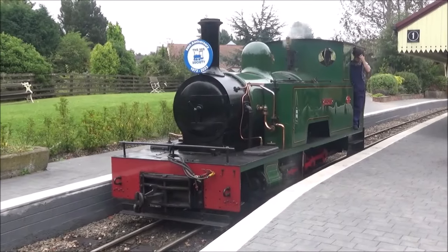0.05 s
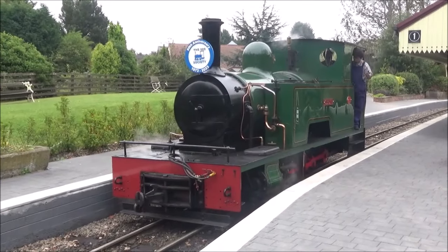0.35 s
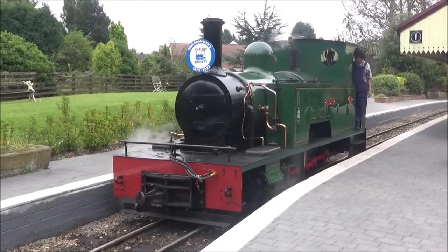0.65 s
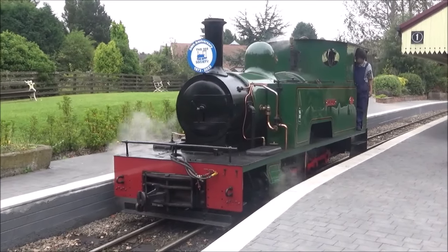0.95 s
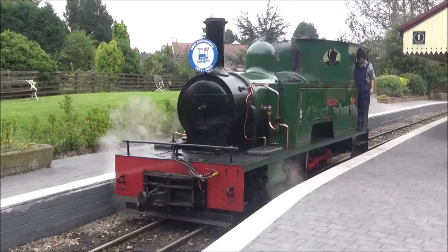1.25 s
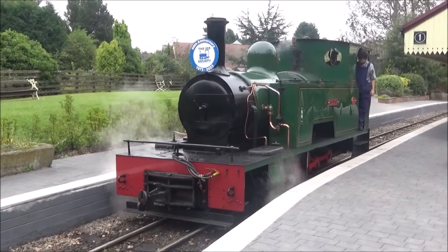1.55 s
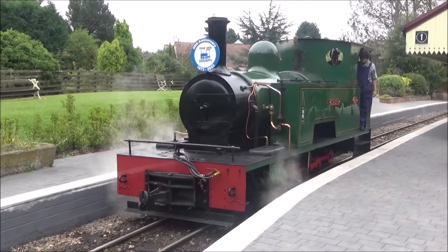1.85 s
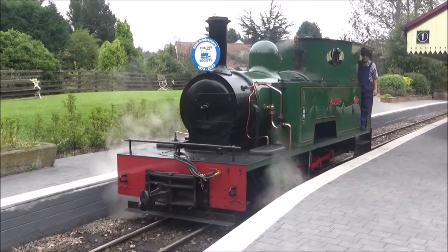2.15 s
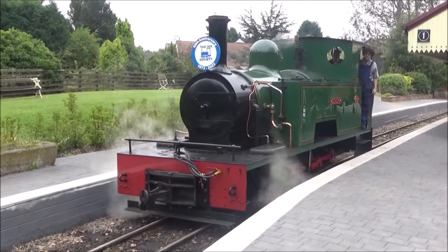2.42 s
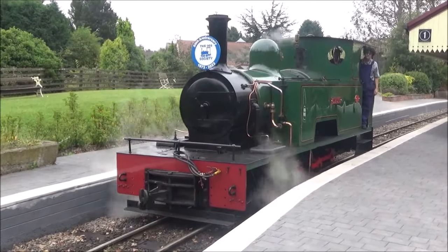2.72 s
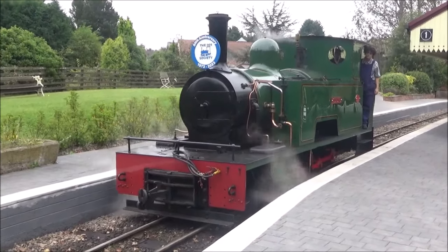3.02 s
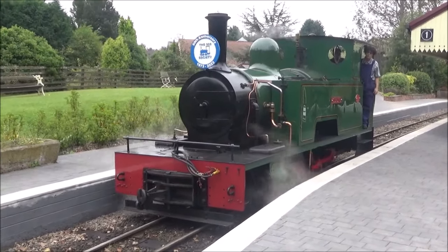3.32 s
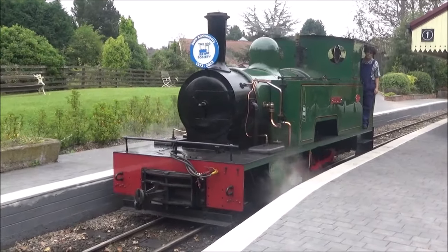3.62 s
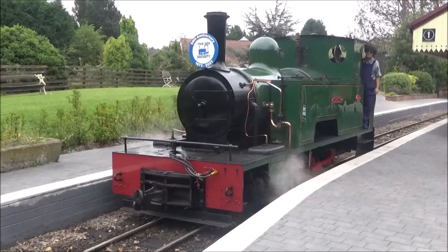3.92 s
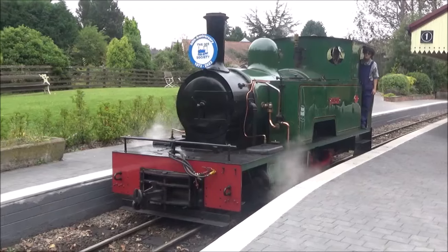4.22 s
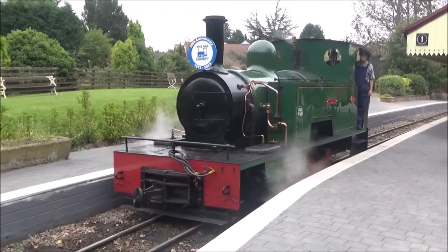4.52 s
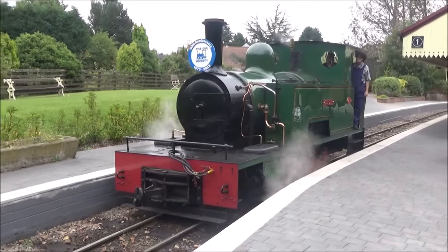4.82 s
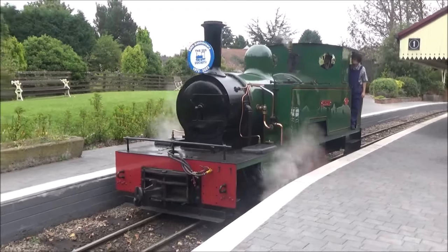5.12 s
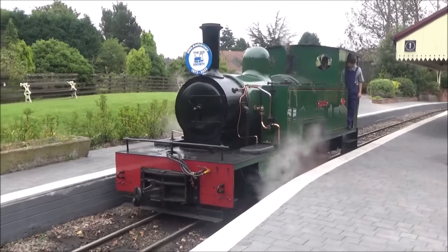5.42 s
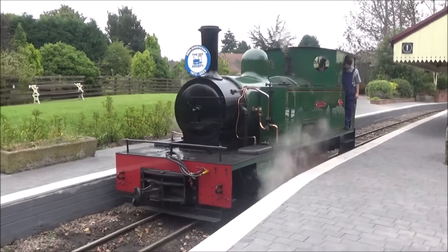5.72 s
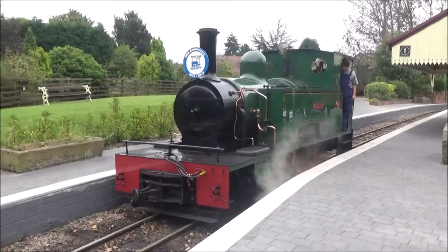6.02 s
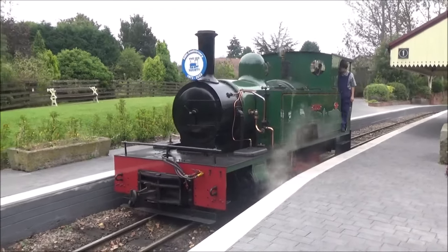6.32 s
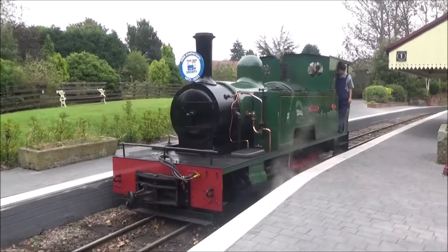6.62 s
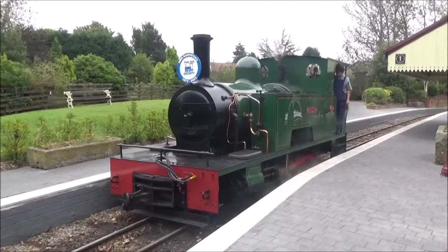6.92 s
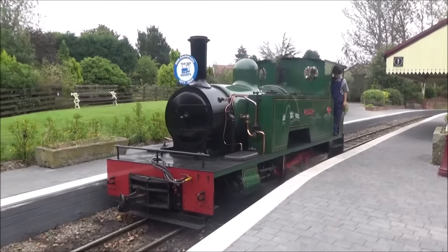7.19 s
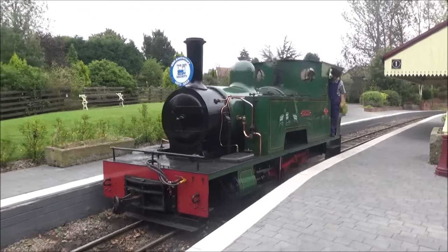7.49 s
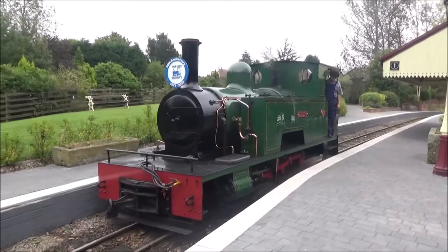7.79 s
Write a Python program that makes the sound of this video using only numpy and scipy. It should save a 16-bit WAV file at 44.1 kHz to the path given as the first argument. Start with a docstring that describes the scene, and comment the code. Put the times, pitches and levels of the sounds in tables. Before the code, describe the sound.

A small steam locomotive moves off along an outdoor platform, heard close by over the faint simmer of its boiler. A bright jet of steam swells from the start, with a sharp rod clank at about 0.4 seconds and a knock at 0.8. The hiss holds loud and level from 1 to 2.5 seconds, slightly ringing, with faint spurts of very high, thin whistling. The running gear briefly groans and thumps near 2.4 seconds, and the steam fades by 3.2. A few light clanks follow around 3.4 seconds as a second, brighter blast begins. It is loudest from about 4.5 to 6 seconds and dies away by 6.5, with dull thumps and low wheel rumble underneath. From 7 seconds the rumble grows, with heavier thumps and a couple of light clanks, and a third hiss is just rising as the sound ends near 8 seconds.

```python
"""A small steam locomotive moves off along a platform with its cylinder drain cocks open.
Over the simmering boiler, a slow piston stroke blows a long jet of steam that rings among the frames
and whistles thinly as its pressure rises and falls. Rods clank, the running gear thumps and briefly
groans. A second blast follows, the wheels rumble louder as the engine gathers way, and a third blast
is just starting at the end. A gain control holds the blasts level and ducks everything else under them."""
import sys
import numpy as np
from scipy import signal
from scipy.fft import rfft, irfft, next_fast_len
from scipy.io import wavfile

SR = 44100
rng = np.random.default_rng(int(sys.argv[2]) if len(sys.argv) > 2 else 0)


def transcribe(signal):
    """Save signal, clipped to [-1, 1], as a 16-bit WAV file at the path in sys.argv[1]."""
    frames = np.atleast_2d(signal).T
    limited = np.clip(frames, -1, 1)
    pcm = np.round(limited * 32767).astype(np.int16)
    wavfile.write(sys.argv[1], SR, pcm)


N = 350595
TIME = np.arange(N) / SR
FFT_SIZE = next_fast_len(N)
FREQS = np.maximum(np.fft.rfftfreq(FFT_SIZE, 1 / SR), 1)
SIDES = np.array([[1], [-1]])  # left, right
CUTOFF_HZ = 11050


def from_db(db):
    """Decibels to gain."""
    return 10 ** (np.asarray(db) / 20)


def unit_rms(x):
    """Scale to an rms of 1."""
    return x / np.sqrt(np.mean(x ** 2) + 1e-20)


def in_time(rows):
    """One envelope for each column after the time column."""
    s, *columns = np.transpose(rows)
    return [np.interp(TIME, s, column) for column in columns]


def at_hz(points, hz):
    """Read a curve on a log-frequency axis."""
    point_hz, value = np.transpose(points)
    return np.interp(np.log(hz), np.log(point_hz), value)


def drift(rate_hz):
    """A random wobble of rms 1, mostly slower than rate_hz."""
    spectrum = rfft(rng.standard_normal(FFT_SIZE)) / (1 + (FREQS / rate_hz) ** 2)
    return unit_rms(irfft(spectrum, FFT_SIZE)[:N])


def below(edge_hz, order):
    """Low-pass gain at every frequency."""
    return 1 / np.sqrt(1 + (FREQS / edge_hz) ** (2 * order))


def above(edge_hz, order):
    """High-pass gain at every frequency."""
    return 1 / np.sqrt(1 + (edge_hz / FREQS) ** (2 * order))


def resonance(hz, half_width_hz):
    """A bell of height 1 around hz."""
    return 1 / (1 + ((FREQS - hz) / half_width_hz) ** 2)


def add(track, s, sound):
    """Mix a short sound in at time s."""
    start = max(int(s * SR), 0)
    track[..., start:start + sound.shape[-1]] += sound[..., :N - start]


# Stereo image of the noise, tightest in the bass. Each row: frequency in Hz, left-right correlation.
LIKENESS = [(60, 1), (130, 1), (430, 1), (820, 0.966), (1580, 0.86), (3040, 0.824), (5850, 0.86),
            (8000, 0.918), (11000, 0.953)]

def noise(colour):
    """Narrow stereo noise of a given colour, rms 1."""
    alike = np.clip(at_hz(LIKENESS, FREQS), 0, .995)
    mid, side = rfft(rng.standard_normal((2, FFT_SIZE)))
    stereo = np.sqrt(1 + alike) * mid + np.sqrt(1 - alike) * side * SIDES
    return unit_rms(irfft(colour * stereo, FFT_SIZE)[:, :N])


# Tone of the boiler bed. Each row: frequency in Hz, relative level in dB.
SIMMER_COLOUR = [(25, -6), (60, 3.5), (160, -7.5), (300, -3.5), (500, -13), (800, -3), (1300, -7.5),
                 (2500, -12.5), (3800, -6), (6400, -11.5), (8500, -8.5), (11000, -12)]

def simmer(level_db):
    """The quiet, steady bed of the fire and leaking glands."""
    colour = from_db(at_hz(SIMMER_COLOUR, FREQS)) * below(CUTOFF_HZ, order=12)
    return from_db(level_db) * noise(colour)


def cock_open(blast):
    """A gate with quick fades: 1 while a blast lasts, 0 outside it."""
    start, end = blast[0][0], blast[-1][0]
    return np.interp(TIME, [start - .03, start, end, end + 0.0235], [0, 1, 1, 0])


# Swell of each blast. Each row: time in seconds, steam flow as relative hiss level in dB,
# leftward pan in dB before PAN_SHARE scales it.
FIRST_BLAST = [(0.0, -30, 1.5), (0.35, -23, 2.5), (0.74, -16.5, 2.5), (1.05, -11, 3), (1.5, -7.5, 2.5),
               (2.25, -8.5, 2.5), (2.58, -19, 3), (3.09, -40.5, 2.5), (3.4, -52.5, -0.5)]
SECOND_BLAST = [(3.42, -51, 1.5), (3.48, -34, 1.5), (3.6, -23.5, 1.46), (3.95, -19, 1.5),
                (4.46, -15.5, 1.15), (4.68, -11.5, .2), (5.3, -5, .2), (5.98, -17, 1.05),
                (6.11, -23.5, 2.4), (6.28, -26, 3.6), (6.55, -60.5, 1)]
LAST_BLAST = [(6.9, -52.5, -0.5), (7.08, -43.5, 3), (7.19, -39, 3), (7.27, -38.5, 2.5), (7.33, -50.5, -0.5),
              (7.42, -47, -2.5), (7.7, -45.5, -3), (7.95, -27, 1)]
# Broad tone of each jet. Each row: frequency in Hz, relative level in dB.
FIRST_COLOUR = [(250, -21), (550, -21), (800, -14.5), (1300, -10), (2000, -7.5), (3400, -12.5),
                (4700, -4.5), (6600, -13.5), (8000, -3), (9800, -2.5), (11000, -9.5)]
SECOND_COLOUR = [(250, -33), (550, -20.5), (800, -18.5), (1300, -10), (2000, -7), (3400, -8.5), (4700, -3),
                 (6600, -5.5), (8000, 1), (9800, 2.5), (11000, -5)]
LAST_COLOUR = [(250, -19.5), (550, 3), (800, 0.5), (1300, -3), (2000, -0.5), (3400, -5), (4700, -5.5),
               (6200, -10), (7400, -5), (8800, -0.5), (9900, 0.5), (11000, -9)]
# Peaks and notches of the drain pipe and the space under the frames.
# Each row: centre in Hz, width in Hz, boost or cut in dB.
FIRST_CAVITY = [(760.8, 26.6, 7.5), (981, 55, -8), (1258.4, 65, 5), (1463, 26.8, 9.5), (1682.3, 29.7, 8),
                (1817, 48, 3.5), (1870, 56, 9), (2119.6, 48.5, 4.5), (2178.7, 48.6, 8.5), (2335, 17.8, 8.5),
                (2672, 63, 4.5), (2914, 33.5, 12), (3091.6, 45, 10.5), (3574, 41, 6), (3865, 28.6, 5),
                (4000, 14.4, 12), (4380, 124, -2.5), (5060, 51, 7), (5756, 26, 13.5), (5970, 118, 8.5),
                (6545, 160, 8.5), (6715, 73, 9), (7150, 50, 9), (8077, 159, -6)]
SECOND_CAVITY = [(754.4, 43, 11.5), (965, 57, 5.5), (1232.5, 73, 4.5), (1482, 25, 4.5), (1531, 51, -10.5),
                 (1585, 45, 4.5), (2816, 136, 3.5), (3060, 88, 4), (3959.4, 76, 11), (4009, 223, -5.5),
                 (4674, 158, 3.5), (5562, 140, 5), (6980, 120, -5.5), (8020, 120, -2.5), (10360, 220, -2),
                 (10495, 344, 4)]
LAST_CAVITY = [(3160, 220, 4), (3410, 70, 4), (3930, 120, 5), (6740, 100, 3.7), (6860, 120, 3.4),
               (7340, 100, 3), (8400, 80, 3.1), (8500, 166, 4.1)]
# The microphones place highs more sharply than lows. Each row: frequency in Hz, factor on the pan.
PAN_SHARE = [(300, 0), (1200, 0.2), (2500, 0.66), (4500, 0.86), (6400, 1.1), (7200, 0.82), (11000, 0.91)]
USUAL_FLOW_DB, RUSH_FOLLOWS = -17.5, 0.846  # reference flow; dB of rush for each dB of flow

def steam_jet(blast, colour, cavity, level_db, rush_db, roar_db, roar_follows, flutter_db, sputter_db):
    """Turbulence from a drain cock, coloured by nearby cavities: fine eddies hiss, large ones roar."""
    flow_db, pan_db = in_time(blast)
    excess_db = flow_db - USUAL_FLOW_DB
    cavity_db = sum(db * resonance(hz, width / 2) for hz, width, db in cavity)
    tone = from_db(at_hz(colour, FREQS) + cavity_db) * above(colour[0][0], order=2)
    # big eddies grow more slowly with the flow than the hiss does
    roar_hz, hiss_hz = 3000, 7000
    hiss = (above(hiss_hz, order=12), flow_db, 9000)
    rush = (above(roar_hz, order=4) * below(hiss_hz, order=12), rush_db + RUSH_FOLLOWS * excess_db, 5000)
    roar = (below(roar_hz, order=4), roar_db + roar_follows * excess_db, 2000)
    out = 0
    for band, band_db, centre_hz in (hiss, rush, roar):
        lean_db = SIDES * pan_db * at_hz(PAN_SHARE, centre_hz) / 2
        out = out + noise(tone * band) * from_db(band_db + lean_db)
    # the plume wavers, and condensed water in the steam makes it sputter
    waver_db = flutter_db * drift(17.4) + sputter_db * drift(174)
    return out * from_db(level_db + waver_db) * cock_open(blast)


# Breathy notes of the drain pipe. Each row: pitch in Hz, half-width in Hz, relative level in dB,
# flow in dB at which the note sings loudest.
FIRST_PIPE = [(950, 380, -44.5, -20.5), (2950, 70, -50.5, -21), (4680, 290, -41, -35.5),
              (4985, 110, -39, -17.5), (5350, 120, -46, -33), (9490, 360, -37, -31)]
SECOND_PIPE = [(742, 90, -44, -48), (936, 80, -41, -34), (1003, 300, -38.5, -19.5), (2430, 60, -55, -35.5),
               (3014, 17, -46, -40), (4700, 260, -46, -39)]
LAST_PIPE = [(3400, 440, -42, -27), (3406, 22, -51.5, -34.5), (7180, 610, -44, -35.5)]

def pipe_tones(blast, tones, level_db, flow_range_db=9):
    """A barely open cock hardly damps the drain pipe, so its resonances stand out of the hiss."""
    flow_db, out = in_time(blast)[0], 0
    for hz, half_width, db, singing_db in tones:
        loudness = np.exp(-((flow_db - singing_db) / flow_range_db) ** 2)
        out = out + from_db(db + level_db) * loudness * noise(resonance(hz, half_width))
    return out * cock_open(blast)


# The rumble builds as the engine gathers way. Each row: time in seconds, relative level in dB.
RUMBLE_SWELL = [(0.0, -61), (0.58, -49.5), (0.95, -64), (2.0, -51.5), (2.35, -53), (2.6, -53.5),
                (3.25, -51), (3.4, -44), (4.5, -41), (5.05, -44), (5.7, -42), (6.2, -47.5), (7.22, -41.5),
                (7.58, -34), (7.95, -33.5)]
# Its bass-heavy tone. Each row: frequency in Hz, relative level in dB.
RUMBLE_COLOUR = [(25, -8.5), (50, -0.5), (85, 0), (125, 1.5), (175, -2), (230, -3.5), (310, -6),
                 (480, -17.5), (800, -14.5), (1300, -26.5), (2000, -24), (2500, -30.5)]

def wheel_rumble(level_db, lumpy_db, side_db):
    """Wheels on uneven rail shake the frames and tanks, which radiate along their whole length."""
    swell_db, = in_time(RUMBLE_SWELL)
    colour = from_db(at_hz(RUMBLE_COLOUR, FREQS)) * below(2620, order=4)
    rumble = noise(colour) + from_db(side_db) * SIDES * noise(colour)[0]
    return rumble * from_db(swell_db + level_db + lumpy_db * drift(9.4))


def bumps(per_s=6, lift_db=12.5, typical_hz=181.7, t60_s=0.145):
    """Random light knocks that grow with the rumble, as rows for thumps() to play."""
    count = int(per_s * N / SR)
    when, strength, pitch = rng.random((count, 3)).T
    s = when * N / SR
    db = np.interp(s, *np.transpose(RUMBLE_SWELL)) + lift_db + 6 * (strength - .5)
    hz = typical_hz * 2 ** (1.4 * (pitch - .5))
    return np.column_stack([s, db, hz, np.full(count, t60_s)])


# Ringing modes of the steelwork. Each row: frequency in Hz, relative level in dB.
STEEL_MODES = [(291, 14.5), (450, 5.5), (576, -9.5), (619, 7), (985, 3.5), (1206, -5.5), (1490, -2),
               (1733, 2.5), (1950, 0.5), (2130, -15.5), (2400, -0.5), (2896, -19), (3200, 5.5)]
# Hits of rods and couplings. Each row: start in seconds, relative peak in dB,
# pitch region struck hardest in Hz, seconds to fade by 60 dB.
CLANKS = [(0.369, -14.5, 2350, 0.164), (0.791, -23.5, 582, 0.142), (0.817, -30.5, 330, 0.081),
          (3.336, -31.5, 450, 0.076), (3.367, -30.5, 2100, 0.18), (3.381, -28.5, 1266, 0.148),
          (3.401, -33, 554, 0.27), (3.623, -28, 443, 0.094), (7.362, -30.5, 2000, .12),
          (7.679, -28.5, 2100, 0.21)]

def clanks(level_db, rattle, reach_octaves):
    """Loose steel meets steel, chatters for a moment and rings in the modes near the struck region."""
    out, t = np.zeros((2, N)), TIME[:SR // 2]
    mode_hz, mode_db = np.transpose(STEEL_MODES)
    attack = 1 - np.exp(-t / 0.00051)
    for s, db, hz, t60 in CLANKS:
        strength = from_db(mode_db) / (1 + (np.log2(mode_hz / hz) / reach_octaves) ** 2)
        phases = rng.uniform(0, 2 * np.pi, (len(STEEL_MODES), 1))
        ring = unit_rms(strength @ np.sin(2 * np.pi * mode_hz[:, None] * t + phases))
        band = signal.butter(2, [hz / 2, hz * 1.55], "band", fs=SR, output="sos")
        chatter = unit_rms(signal.sosfilt(band, rng.standard_normal((2, len(t)))))
        blow = (ring + rattle * chatter) * from_db(-60 * t / t60) * attack
        add(out, s, from_db(db + level_db) * blow / np.abs(blow).max())
    return out


# Heavy, dull hits of the running gear. Each row: start in seconds, relative peak in dB,
# centre pitch in Hz, seconds to fade by 60 dB.
THUMPS = [(0.571, -28, 292, 0.257), (0.79, -23.5, 257.6, 0.103), (2.47, -24, 195.7, 0.104),
          (2.95, -31, 229, 0.091), (3.146, -32, 250.7, 0.118), (3.379, -25, 200, 0.082),
          (3.612, -27.5, 235.7, 0.103), (3.948, -25, 125.6, .15), (4.222, -23, 226.2, 0.147),
          (4.486, -25.5, 229.4, 0.103), (4.566, -23, 245.3, 0.08), (4.765, -23, 210, .12),
          (4.86, -22, 244.4, 0.252), (5.48, -22, 170, .14), (5.805, -23.5, 167.8, 0.244),
          (6.459, -30.5, 192.5, 0.15), (6.883, -27, 159.3, .1), (7.274, -25, 170.2, 0.114),
          (7.492, -21, 164.5, .15), (7.655, -23, 280, 0.066), (7.737, -21, 159.6, 0.345)]

def thumps(blows, level_db, rise_s, spread, mode_count=9):
    """Slack taken up in the running gear: a cluster of damped low plate modes for each blow."""
    out, t = np.zeros((2, N)), TIME[:SR // 2]
    weights = np.hanning(mode_count + 2)[1:-1]
    attack = 1 - np.exp(-t / rise_s)
    for s, db, hz, t60 in blows:
        offsets = np.linspace(-1, 1, mode_count) + rng.normal(0, 0.1125, mode_count)
        mode_hz = hz * np.exp(spread * offsets)
        phases = rng.uniform(0, 2 * np.pi, (mode_count, 1))
        body = weights @ np.sin(2 * np.pi * mode_hz[:, None] * t + phases)
        blow = body * from_db(-60 * t / t60) * attack
        add(out, s, from_db(db + level_db) * blow / np.abs(blow).max())
    return out


# Moments when the whistle catches. Each row: middle in seconds, length in seconds, relative level in dB.
WHISTLE_SPURTS = [(0.75, .09, -3), (1.02, .24, -11), (2.46, .16, -2), (2.61, .06, -7), (4.36, .2, -3),
                  (4.57, .09, -3), (4.72, .2, -6), (5.75, .14, -7), (5.91, .12, -5)]

def whistle(blast, level_db, top_hz, sag_hz, wander_hz, flicker_db=2.5):
    """A thin edge tone at the lip of a cock: it nears top_hz at full flow and sags as the flow falls."""
    flow_db = in_time(blast)[0]
    hz = np.maximum(top_hz - sag_hz / from_db(flow_db - USUAL_FLOW_DB), top_hz / 2)
    phase = 2 * np.pi * np.cumsum(hz + wander_hz * drift(108.9)) / SR
    spurts = sum(from_db(db) * np.exp(-(2 * (TIME - s) / length) ** 2)
                 for s, length, db in WHISTLE_SPURTS)
    loudness = from_db(flow_db + level_db + flicker_db * drift(35))
    return np.sqrt(2) * np.sin(phase) * spurts * loudness * cock_open(blast)


def groan(start_s, length_s, hz, half_width_hz, level_db):
    """A rough low resonance of the frames, rubbed for a moment."""
    rubbing = np.interp(TIME - start_s, [0, .02, length_s, length_s + .03], [0, 1, .5, 0])
    return from_db(level_db) * rubbing * noise(resonance(hz, half_width_hz))


def scene():
    """Three blasts of steam over the moving engine."""
    first = (steam_jet(FIRST_BLAST, FIRST_COLOUR, FIRST_CAVITY, level_db=0, rush_db=-24, roar_db=-31,
                       roar_follows=0.6, flutter_db=0.5, sputter_db=0.0759)
             + pipe_tones(FIRST_BLAST, FIRST_PIPE, level_db=0.92)
             + whistle(FIRST_BLAST, level_db=0, top_hz=10720, sag_hz=1000, wander_hz=45.5))
    second = (steam_jet(SECOND_BLAST, SECOND_COLOUR, SECOND_CAVITY, level_db=1.5, rush_db=-24.5,
                        roar_db=-31, roar_follows=0.529, flutter_db=0.51, sputter_db=0.48)
              + pipe_tones(SECOND_BLAST, SECOND_PIPE, level_db=-2.95)
              + whistle(SECOND_BLAST, level_db=-0.5, top_hz=11030, sag_hz=990, wander_hz=45))
    last = (steam_jet(LAST_BLAST, LAST_COLOUR, LAST_CAVITY, level_db=0.5, rush_db=-24.5, roar_db=-31.5,
                      roar_follows=0.67, flutter_db=0.5, sputter_db=1)
            + pipe_tones(LAST_BLAST, LAST_PIPE, level_db=1.97))
    boiler = simmer(level_db=-44)
    gear = (wheel_rumble(level_db=1.5, lumpy_db=1.5, side_db=-11.5)
            + clanks(level_db=2, rattle=1.3, reach_octaves=0.38)
            + thumps([*THUMPS, *bumps()], level_db=-3.5, rise_s=0.00437, spread=0.83)
            + groan(start_s=2.25, length_s=.19, hz=235, half_width_hz=35, level_db=-38))
    return first + second + last + gear + boiler


def gain_control(x, threshold_db=-16.5, knee_db=0.01, squeeze=0.8754, response_s=0.02):
    """Ducks the whole mix by a share (squeeze) of its running level's excess over the threshold."""
    keep = np.exp(-1 / (response_s * SR))
    power = signal.lfilter([1 - keep], [1, -keep], np.mean(x ** 2, axis=0))
    running_db = 10 * np.log10(power + 1e-12)
    over_db = knee_db * np.logaddexp(0, (running_db - threshold_db) / knee_db)
    return x * from_db(-squeeze * over_db)


# Slight tonal tilt between the two microphones. Each row: frequency in Hz, left minus right in dB.
BALANCE = [(100, -0.12), (600, -0.5), (2200, -0.28), (6500, 1), (7300, -1), (8800, -1.04), (11000, -0.8)]

def record(dry):
    """Gain control rides the level, each side takes its own colour and the top is cut steeply."""
    colour = from_db(SIDES * at_hz(BALANCE, FREQS) / 2)
    top_cut = np.clip((CUTOFF_HZ - FREQS) / 120 + .5, 0, 1)
    spectrum = rfft(gain_control(dry), FFT_SIZE)
    return irfft(spectrum * colour * top_cut, FFT_SIZE)[:, :N]


dry = scene()
out = record(dry)
transcribe(out)
```